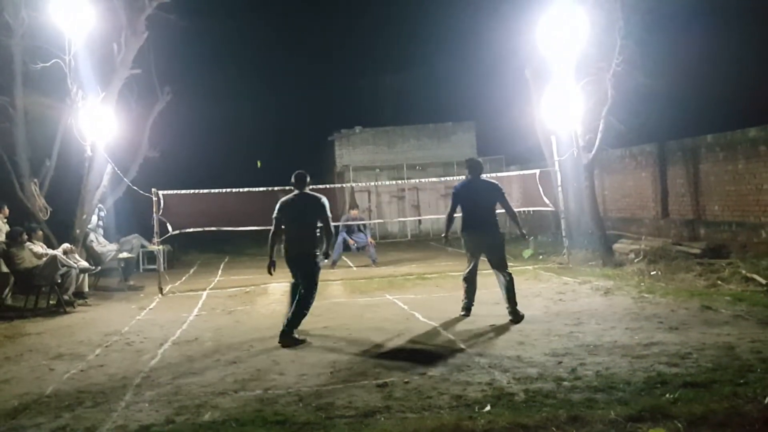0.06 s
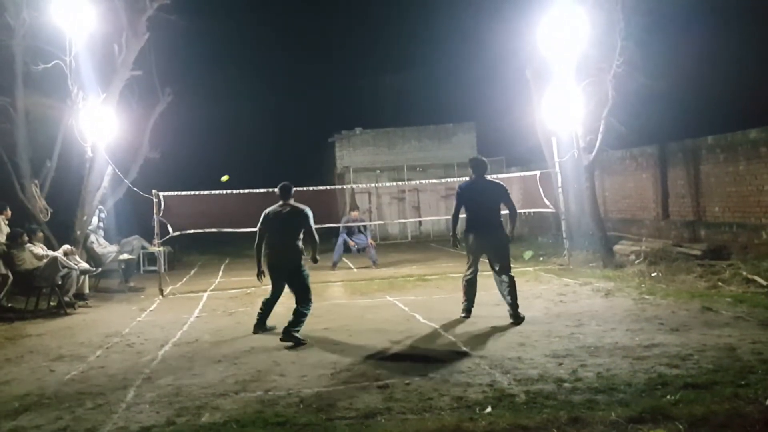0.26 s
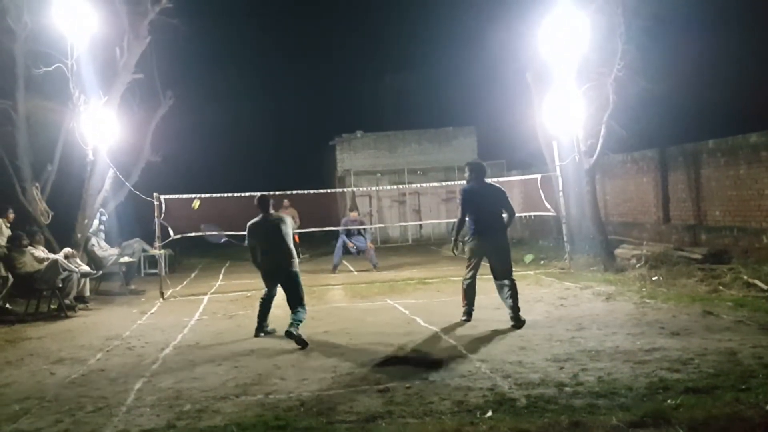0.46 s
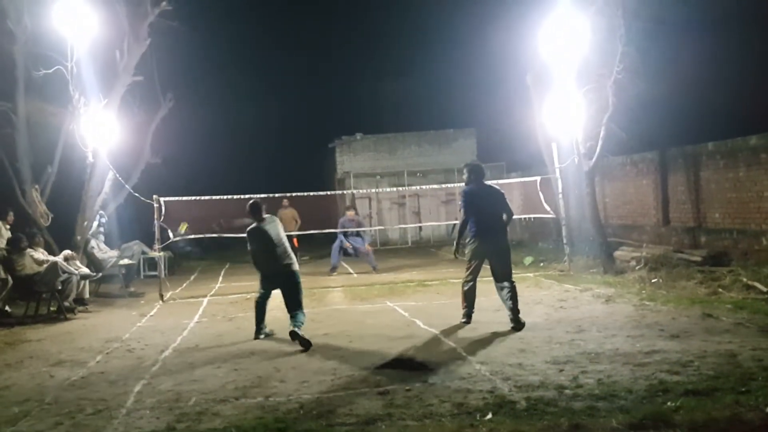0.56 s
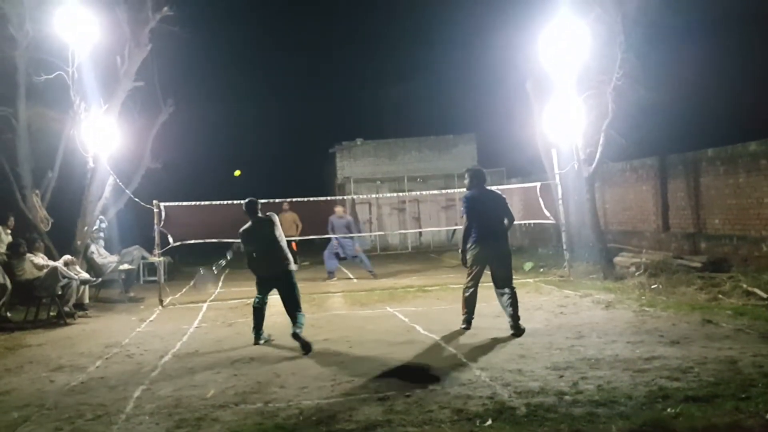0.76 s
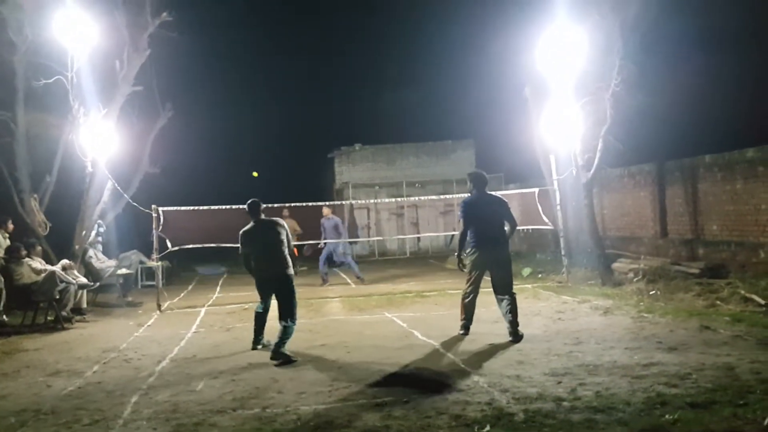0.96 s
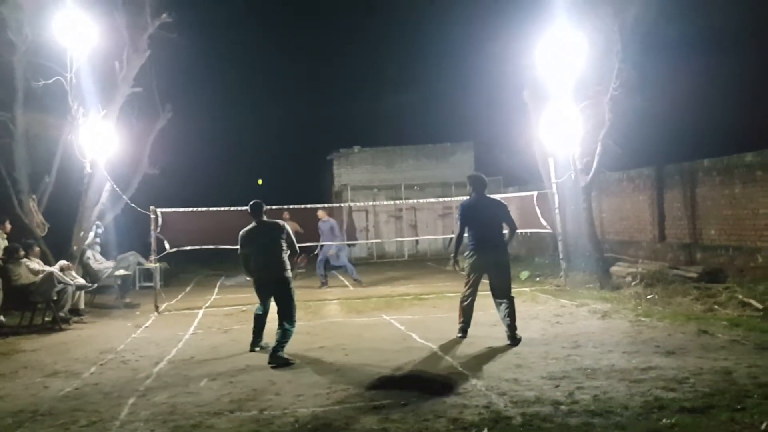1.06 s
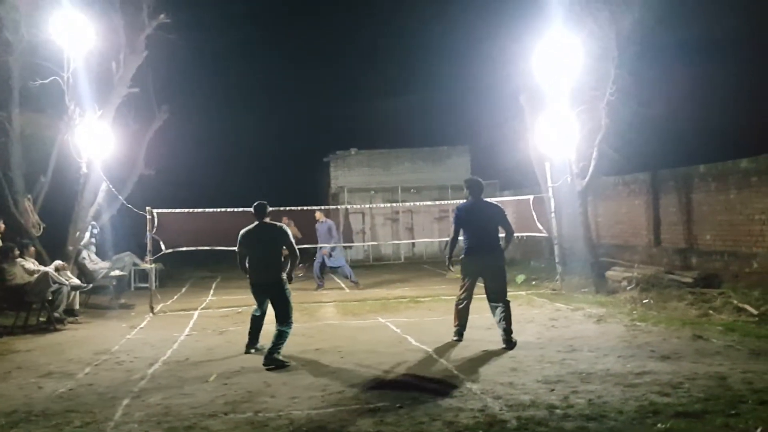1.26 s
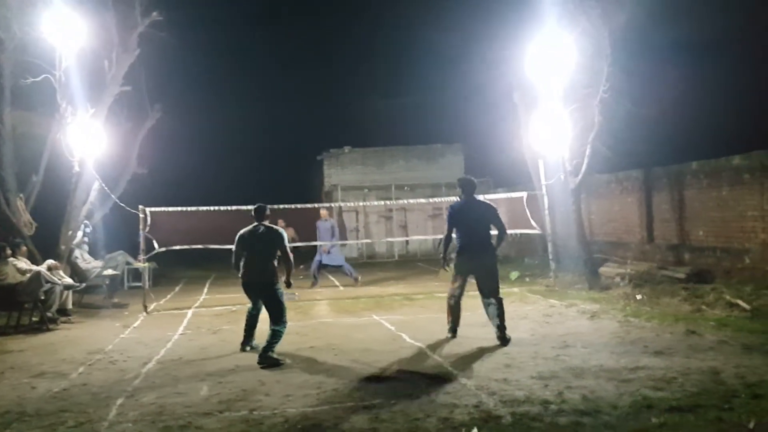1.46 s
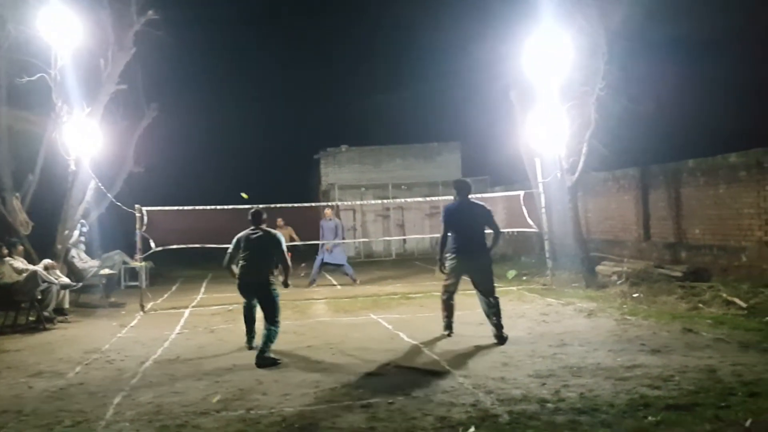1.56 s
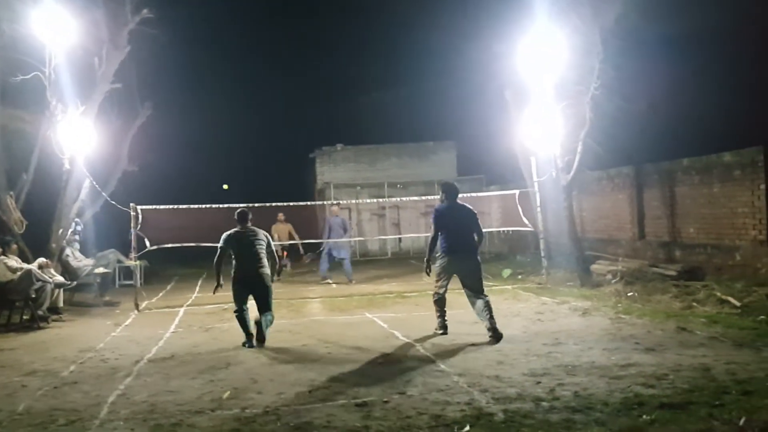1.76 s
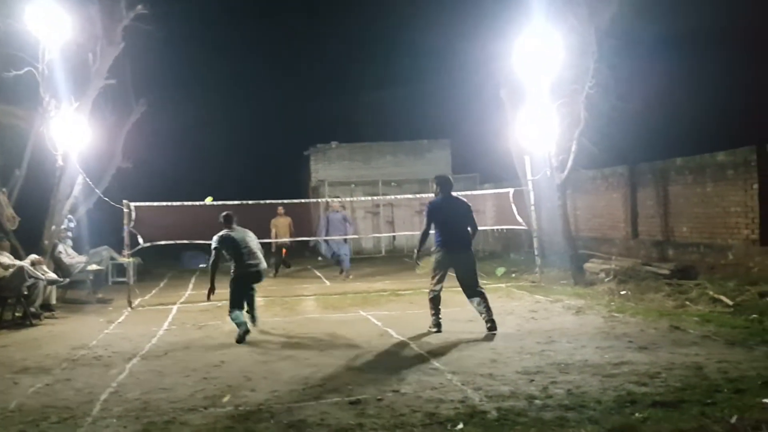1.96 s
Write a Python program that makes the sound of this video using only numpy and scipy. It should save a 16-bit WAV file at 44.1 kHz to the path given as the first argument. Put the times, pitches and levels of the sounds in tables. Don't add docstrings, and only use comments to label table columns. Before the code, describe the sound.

Badminton rackets strike a shuttlecock: a short swish and loud smash with wall echoes, a quieter crackling block, then a faint far hit; dry ticks and shoes scraping grit follow, in a quiet walled yard, heard from behind the players.

```python
import sys
import numpy as np
from scipy import signal
from scipy.fft import rfft, irfft
from scipy.io import wavfile
from scipy.ndimage import uniform_filter1d

SR = 44100
rng = np.random.default_rng(int(sys.argv[2]) if len(sys.argv) > 2 else 0)


def generate_wav(signal):
    frames = np.transpose(np.atleast_2d(signal))
    scaled = np.clip(frames, -1, 1) * 32767
    pcm = np.round(scaled).astype(np.int16)
    wavfile.write(sys.argv[1], SR, pcm)


def gain_from_decibels(decibels):
    exponent = np.asarray(decibels, float) / 20
    return 10 ** exponent


N = 88200

PORT_LAG = 4


def fade(t60, length):
    return gain_from_decibels(-60 * np.arange(int(length * SR)) / SR / max(t60, 1e-3))


def band(x, hz, q):
    return signal.lfilter(*signal.iirpeak(min(hz, .4 * SR), max(q, .3), SR), x)


def bell(x, hz, octaves):
    f = np.fft.rfftfreq(x.shape[-1], 1 / SR) + 1
    return irfft(rfft(x) * np.exp(-.5 * (np.log2(f / hz) / octaves) ** 2), x.shape[-1])


def colour(x, points):
    f = np.fft.rfftfreq(x.shape[-1], 1 / SR) + 1
    p = np.array(points)
    gain_db = np.interp(np.log(f), np.log(p[:, 0]), p[:, 1], left=-60)
    return irfft(rfft(x) * gain_from_decibels(gain_db), x.shape[-1])


def air(size):
    alike_hz = 550
    mid, side = rng.standard_normal((2, size))
    side = signal.lfilter(*signal.butter(1, alike_hz, "high", fs=SR), side)
    return mid + side * np.array([[1], [-1]])


def walk(rate, size):
    k = int(SR / rate)
    steps = np.repeat(rng.standard_normal(size // k + 1), k)
    return 1.98 * uniform_filter1d(steps, k)[:size]


def add(out, x, s):
    i = int(s * SR)
    n = min(x.shape[-1], N - i)
    out[:, i:i + n] += x[:, :n]


def ports(x):
    return np.array([x, np.roll(x, PORT_LAG)])


def night():
    # frequency in Hz, level in dB.
    night_tone = [(25, 17), (45, -1), (140, 0), (400, -11.5), (1400, -21), (3600, -33.5), (8500, -34.5),
                  (10500, -41.5), (16000, -29)]
    level_db = -60.5
    noise = colour(air(N), night_tone)
    x = 0
    for hz in 30 * 2. ** np.arange(10):
        x = x + gain_from_decibels(0.5 * walk(3.5, N)) * band(noise, hz, 0.77)
    return gain_from_decibels(level_db) * x / x.std()


def yard(tilt_db):
    # centre in Hz, level in dB, early and late 60 dB decay times in seconds.
    wash_bands = [(137, -3, 0.61, 0.67), (260, 3.5, 0.31, 1.3), (518, 1.5, 0.35, 0.98),
                  (1144, 2.3, 0.47, 0.58), (1800, 0, 0.38, 1.2), (3200, -3.5, 0.35, 0.45),
                  (7000, -2.5, 0.22, 0.69), (13000, -15, 0.12, .4)]
    late_db, patchy_db = -16, 1.2
    n = int(.8 * SR)
    rise = np.clip(np.arange(n) / SR / 0.0065, 0, 1)
    shared_patch = patchy_db * walk(70, n)
    wash = 0
    for hz, db, early, late in wash_bands:
        patch = shared_patch + patchy_db * walk(63.7, n)
        noise = band(band(air(n), hz, 1.83), hz, 1.83) / np.sqrt(hz / 1000)
        decay = fade(early, .8) + gain_from_decibels(late_db) * fade(late, .8)
        wash = wash + gain_from_decibels(db + tilt_db * np.log2(hz / 1000) + patch) * noise * decay
    return rise * wash


def earlier_stroke():
    level_db, ago_s = -43.5, 0.067
    skip = int(ago_s * SR)
    return gain_from_decibels(level_db) * yard(5.0)[:, skip:] * fade(0.082, .8)[:-skip]


def swish():
    length_s, level_db, centre_hz = 0.027, -46.5, 900
    n = int(length_s * SR)
    rise = np.clip(np.arange(n) / 60, 0, 1)
    return gain_from_decibels(level_db) * bell(air(n), centre_hz, 0.86) * rise * 4


def racket(modes, push_ms, crack_db, ring_db, ground_db):
    beat_db, beats_per_s = 2.5, 140
    bloom = .12
    spit_db = -7
    ground_s = .0072
    t = np.arange(int(.5 * SR)) / SR
    u = (t - .0007 - push_ms / 1000) / (push_ms / 2500)
    push = (1 - u ** 2) * np.exp(-u ** 2 / 2)
    crack = bell(rng.standard_normal(len(t)), 6800, .45) * fade(.014, .5)
    crack = crack + gain_from_decibels(spit_db) * bell(rng.standard_normal(len(t)), 12500, .25) * fade(.02, .5)
    ring = 0
    for hz, db, t60 in modes:
        beat = beat_db * min(0.16 / t60, 1) * walk(beats_per_s, len(t))
        swell = 1 - np.exp(-t / (0.00043 + bloom * max(t60 - .2, 0)))
        ring = ring + gain_from_decibels(db + beat) * np.sin(2 * np.pi * hz * (t - .001)) * fade(t60, .5) * swell
    ring_start = np.clip((t - .001) / 0.0015, 0, 1)
    x = push + gain_from_decibels(crack_db) * crack + gain_from_decibels(ring_db) * ring * ring_start
    reflected = np.roll(x, int(ground_s * SR)) * (t > ground_s)
    return x + gain_from_decibels(ground_db) * band(reflected, 600, 0.6)


def slap(hz, cycles):
    rough_db = -6
    t = np.arange(int(.05 * SR)) / SR - .015
    rough = gain_from_decibels(rough_db) * bell(air(len(t)), hz, 0.81) / np.sqrt(hz / 5000)
    wave = -np.cos(2 * np.pi * hz * t) + rough
    envelope = np.exp(-2 * (t * hz / cycles * 2) ** 2 / np.where(t > 0, 4, 1))
    x = bell(wave * envelope, hz, 2.2)
    return np.array([x[0], np.roll(x[1], PORT_LAG)])


def grit():
    # start in seconds, length in seconds, level in dB, change in dB over the length.
    scuffs = [
        (0.433, 0.068, -72, 7.5),
        (0.9, 0.11, -71, 2),
        (1.415, 0.024, -62.5, -1),
        (1.533, 0.05, -68.5, 11),
        (1.658, 0.049, -62, -0.5),
        (1.729, 0.049, -49.5, -6.5),
        (1.773, 0.07, -51, -9.5),
        (1.851, 0.11, -49.5, -12),
        (1.964, 0.066, -56.5, -8),
    ]
    # frequency in Hz, level in dB.
    grain_tone = [(800, -30), (1800, -14), (2400, -2), (3300, 1.5), (4300, -8), (8000, -9), (12000, -14),
                  (16000, -14)]
    grains_per_s, spread_db, grain_t60_s = 1800, 3.5, .006
    t = np.arange(N) / SR
    env = np.zeros(N)
    for s, length, db, change_db in scuffs:
        u = (t - s) / length
        rise = np.clip((t - s) / 0.0069, 0, 1)
        fall = np.clip((1 - u) * 3, 0, 1)
        env += gain_from_decibels(db + change_db * np.clip(u, 0, 1)) * rise * fall
    chosen = rng.random(N) < grains_per_s / SR
    hits = 0.0078 + chosen * gain_from_decibels(spread_db * rng.exponential(size=N))
    grains = signal.fftconvolve(hits, fade(grain_t60_s, .01))[:N]
    x = colour(grains * air(N), grain_tone)
    return env * x / x.std()


def burst(hz, octaves, t60, wide_db):
    bounce_s, bounce_db = .0007, -8
    left_lag = 3
    v = rng.standard_normal((2, int(.04 * SR)))
    x = v[0] + gain_from_decibels(wide_db) * v[1] * np.array([[1], [-1]])
    rise = np.clip(np.arange(v.shape[1]) / SR / (t60 / 25), 0, 1)
    x = bell(np.roll(x * fade(t60, .04) * rise, 44, axis=1), hz, octaves)
    bounce_lag = int((.4 + rng.random()) * bounce_s * SR)
    x = x + gain_from_decibels(bounce_db) * np.roll(x, bounce_lag, axis=1)
    x = np.array([np.roll(x[0], left_lag), x[1]])
    return x / np.abs(x.mean(axis=0)).max()


def tick(hz, t60_ms):
    return gain_from_decibels(0.5) * burst(hz, .95, t60_ms / 1000, -6)


def stone(treble_db):
    hz = 3000 * 2 ** (.07 * rng.standard_normal())
    ring = burst(hz, .28, .006, -8)
    spit = gain_from_decibels(treble_db + 8) * burst(8000, .6, .007, -3)
    return gain_from_decibels(-4.5) * (ring + spit)


def scene():
    # time in seconds, peak in dB, cork push in ms, crack in dB,
    # yard wash in dB, wash tilt in dB per octave.
    hits = [
        (0.207, -6.5, 0.27, -19, -16.5, 0.5),
        (0.649, -21.5, 0.9, -5, -15, 0.13),
        (1.4888, -44, 0.48, -7.5, -5.5, 2),
    ]
    # frequency in Hz, level in dB, 60 dB decay in seconds.
    smash_modes = [(140, -20.5, 0.11), (275, -11.5, 0.083), (390.5, -6, 0.051), (566, -9, 0.051),
                   (741, -12, 0.083), (995, -7, 0.045), (1118, 2, 0.044), (1310, -5.5, 0.054),
                   (1470, -17, 0.1), (1950, -4, 0.02), (1830, -22.5, .1), (2353, -18.5, 0.062),
                   (3200, -10.5, 0.069), (4000, -11.5, 0.022)]
    block_modes = [(153.5, -5, 0.093), (280, 0.5, 0.036), (635, 3.5, 0.019), (827, -2, 0.061),
                   (889, -6.5, 0.43), (1028, -10, 0.044), (1360, -31, 0.38), (1700, -5.5, 0.034),
                   (1810, -18, 0.23), (2272, -11.5, 0.26), (2630, -23, 0.31), (3413, -14.5, .06),
                   (4400, -27.5, 0.45), (4550, -21, 0.18)]
    push_modes = [(260, 0.5, 0.039), (400, -1, 0.045), (740, -14.5, 0.18), (1042, 2, 0.1),
                  (1630, -12, 0.41), (1700, 2.5, 0.024), (2110, -6, 0.29), (2215, -10, 0.13),
                  (2638, -8.5, 0.066), (2970, -16, 0.27)]
    ring_levels = (-7, -6, -1.5)
    ground_levels = (-5, -10, -9)
    # time in seconds, peak in dB, centre in Hz, length in cycles.
    echoes = [(0.24, -25.5, 1970, 4.8), (0.2765, -31.5, 1130, 4.3), (0.282, -32.5, 286, 1.6),
              (0.287, -37, 1500, 2.8), (0.291, -36.5, 1620, 5.8), (0.299, -40, 322, 2),
              (.303, -37, 1500, 5), (.32, -39, 1500, 4), (.365, -42, 1500, 5), (.371, -39.5, 398, 1.9),
              (.405, -43.5, 1300, 3.8), (0.333, -39, 1480, 8), (.340, -37, 1110, 2.8),
              (0.3755, -32.5, 1560, 4.5), (0.386, -44.5, 1130, 4), (.390, -47, 1800, 5.2),
              (0.382, -44, 335, 2.24), (.598, -47.5, 650, 1.25), (0.6759, -34, 2270, 3),
              (0.7319, -28, 354, 0.34), (0.7324, -33, 1400, 0.67), (0.738, -37, 248, 1.2),
              (0.7674, -37.5, 1700, 1.4), (.768, -35.5, 400, 0.68), (0.775, -38.5, 334, 1.5),
              (0.785, -45.5, 183, 1.44), (1.186, -55, 600, 3), (1.195, -54.5, 454, 2),
              (1.206, -49.5, 900, .8), (1.531, -48.5, 260, 1.8), (1.5725, -36.5, 1820, 1.08),
              (1.663, -51, 1080, 3.5), (1.675, -44, 260, 0.85), (1.675, -45, 1500, 0.93),
              (1.978, -39, 1320, 0.89), (1.998, -45.5, 960, 1.6)]
    # time in seconds, peak in dB, centre in Hz, 60 dB decay in ms.
    ticks = [(.437, -70, 12500, 6), (1.0329, -50, 2680, 7.8), (1.111, -61.5, 3380, 11),
             (1.1393, -76, 3620, 13.5), (1.181, -52, 3190, 10), (1.2998, -33, 4710, 5.7),
             (1.3555, -50.5, 4290, 6.7), (1.3925, -56, 8000, 5.2), (1.421, -56, 5080, 8.6),
             (1.4277, -42, 4380, 6.1), (1.699, -53.5, 5450, 10.4), (1.5166, -32.5, 5780, 7.6),
             (1.546, -47, 7980, 9.5), (1.56, -69.5, 7000, 8), (1.5621, -28, 4900, 8.4),
             (1.579, -54, 3940, 6.5), (1.5955, -38, 8840, 8), (1.6013, -36.5, 8600, 6.8),
             (1.643, -44, 4280, 5), (1.715, -43, 8260, 5.5), (1.733, -37, 4680, 14.4),
             (1.745, -37, 5030, 4.7), (1.752, -36, 5050, 15), (1.782, -38.5, 4530, 17),
             (1.7987, -38, 3200, 9.5), (1.8562, -36.5, 4100, 6.4), (1.452, -60, 6000, 7.5),
             (1.9446, -39.5, 9030, 7), (1.9596, -38, 11010, 5.5), (1.9902, -39, 10000, 6.7)]
    # time in seconds, peak in dB, treble in dB.
    stones = [(1.7369, -45, -3), (1.7419, -41, -5), (1.7584, -43, -4), (1.7849, -45, -6), (1.7874, -45, -9),
              (1.7919, -36, -10), (1.8009, -38, -8), (1.8074, -47, -8), (1.8104, -47, -10),
              (1.8129, -48, -12), (1.8214, -51, -12), (1.8464, -45, -15), (1.8484, -45, -10),
              (1.8542, -31, -22), (1.8574, -42, -8), (1.8604, -42, -8), (1.8649, -42, -10),
              (1.8684, -41, -10), (1.8704, -41, -10), (1.8744, -43, -9), (1.8784, -39, -17),
              (1.8824, -38, -18), (1.8899, -43, -12), (1.8944, -50, -12), (1.9019, -51, -8),
              (1.9084, -50, -6), (1.914, -46, -7), (1.9199, -47, -5), (1.9259, -44, -8), (1.9314, -56, 5)]

    out = night() + grit()
    add(out, earlier_stroke(), 0)
    add(out, swish(), .186)
    rackets = (smash_modes, block_modes, push_modes)
    for hit, modes, ring_db, ground_db in zip(hits, rackets, ring_levels, ground_levels):
        s, db, push_ms, crack_db, wash_db, tilt_db = hit
        add(out, gain_from_decibels(db) * ports(racket(modes, push_ms, crack_db, ring_db, ground_db)), s)
        add(out, gain_from_decibels(db + wash_db) * yard(tilt_db), s)
    for s, db, hz, cycles in echoes:
        add(out, gain_from_decibels(db) * slap(hz, cycles), s - .015)
    for s, db, hz, t60_ms in ticks:
        add(out, gain_from_decibels(db) * tick(hz, t60_ms), s - .001)
    for s, db, treble_db in stones:
        add(out, gain_from_decibels(db) * stone(treble_db), s - .001)
    return out


def band_limit(x):
    return signal.sosfilt(signal.butter(12, 16620, fs=SR, output="sos"), x)


def record(dry):
    mid_db, top_db, cut_hz = 3.2, 3.3, 15700
    left = colour(dry[0], [(15, -20), (45, 0), (300, 0), (700, mid_db), (5000, mid_db), (9000, 0),
                           (12000, -top_db), (cut_hz, -top_db), (16100, -16), (16600, -32), (16700, -80)])
    right = colour(dry[1], [(15, -20), (45, 0), (9000, 0), (12000, top_db), (cut_hz, top_db),
                            (16100, -10), (16600, -26), (16700, -80)])
    return band_limit(np.array([left, right]))


dry = scene()
out = record(dry)
generate_wav(out)
```